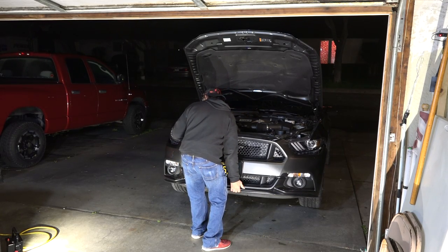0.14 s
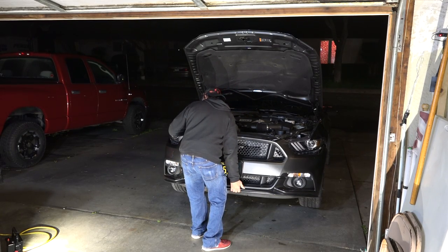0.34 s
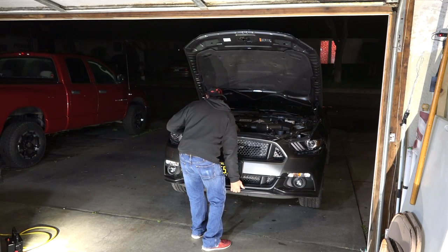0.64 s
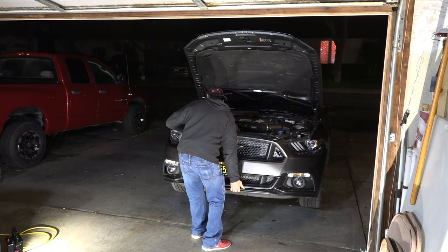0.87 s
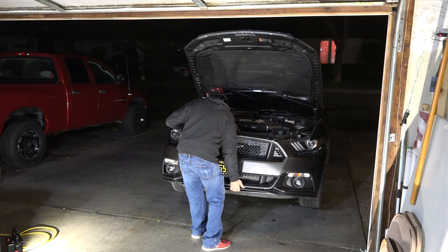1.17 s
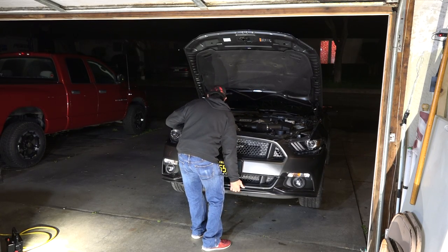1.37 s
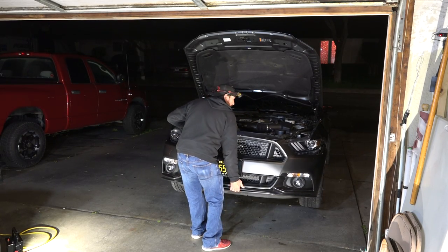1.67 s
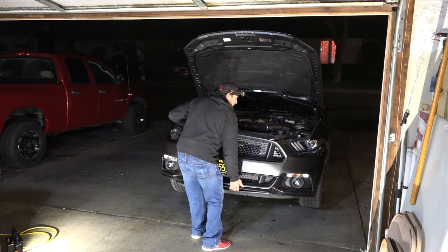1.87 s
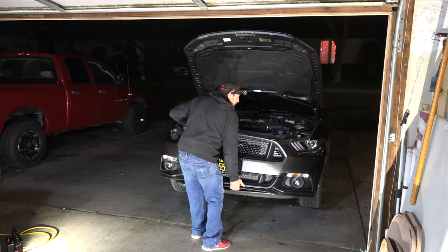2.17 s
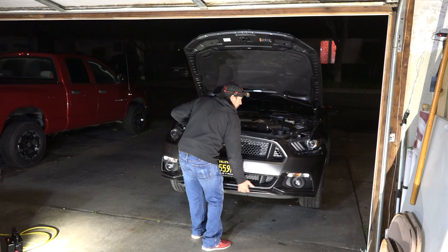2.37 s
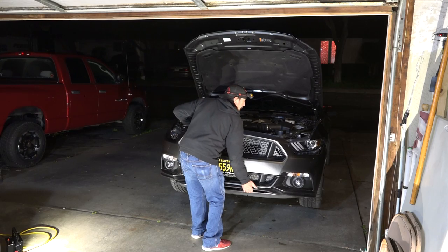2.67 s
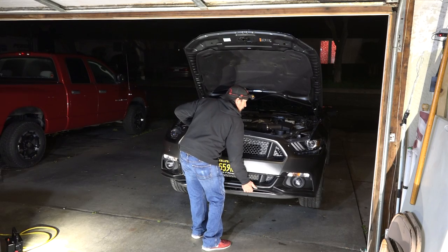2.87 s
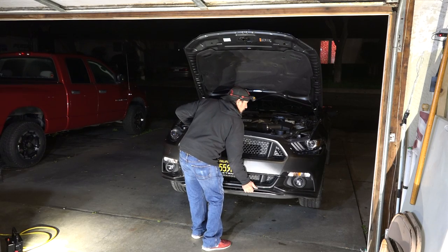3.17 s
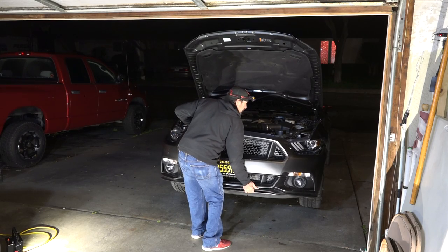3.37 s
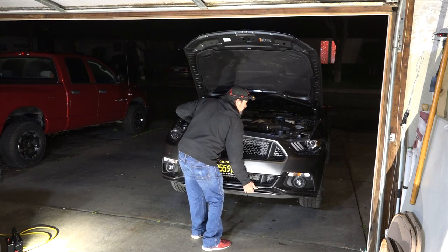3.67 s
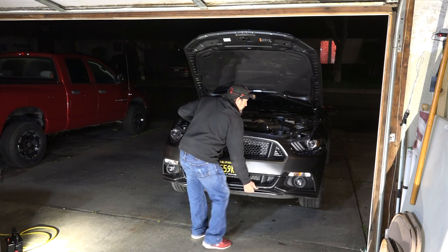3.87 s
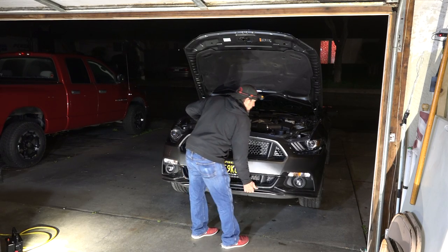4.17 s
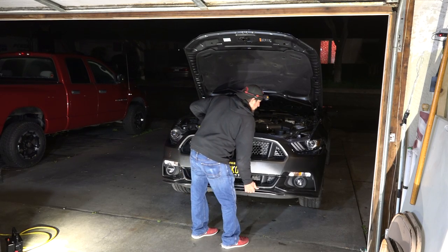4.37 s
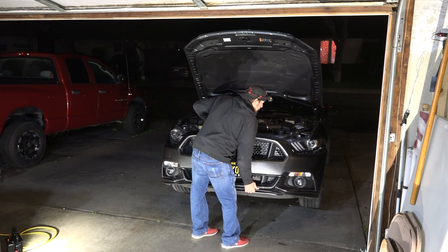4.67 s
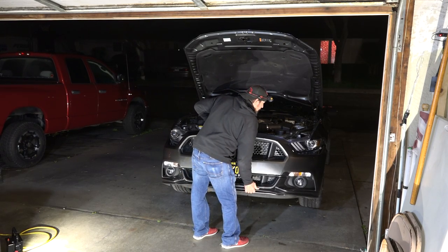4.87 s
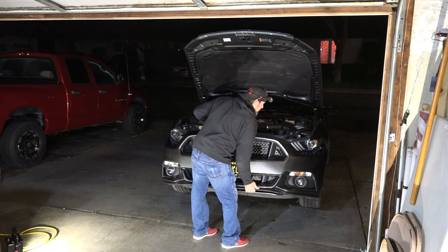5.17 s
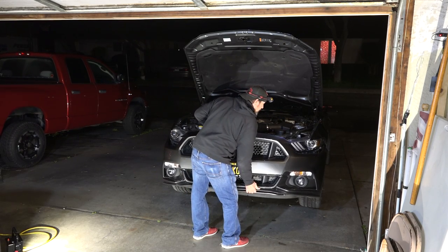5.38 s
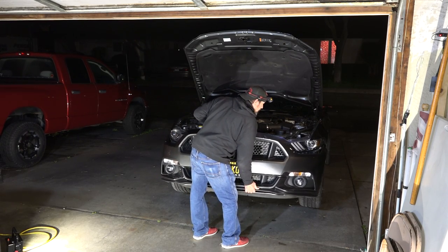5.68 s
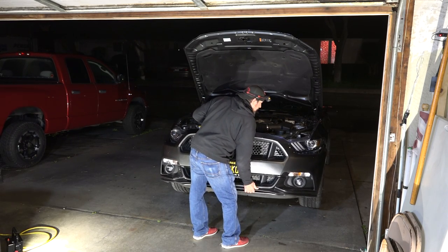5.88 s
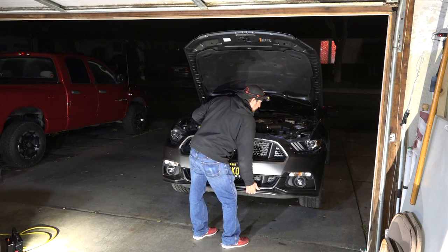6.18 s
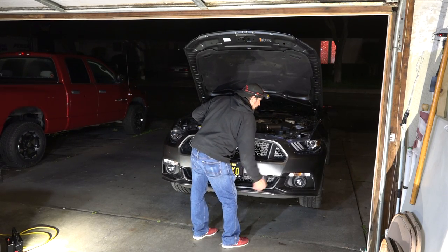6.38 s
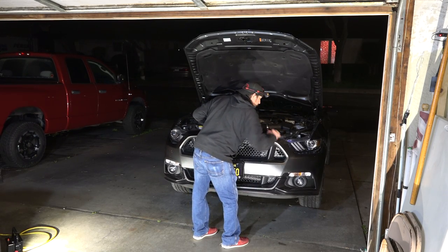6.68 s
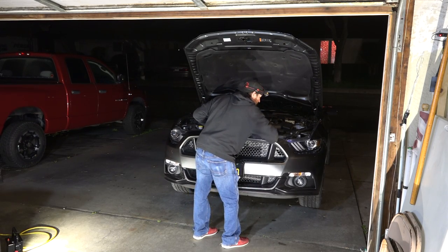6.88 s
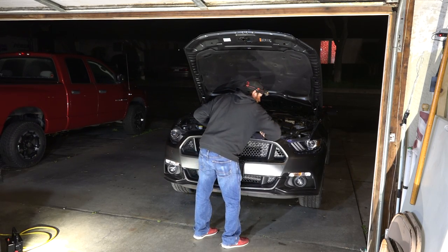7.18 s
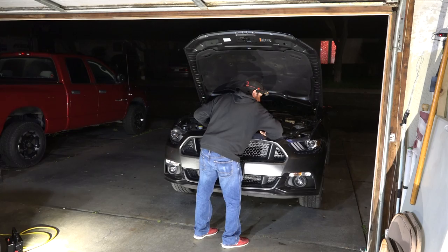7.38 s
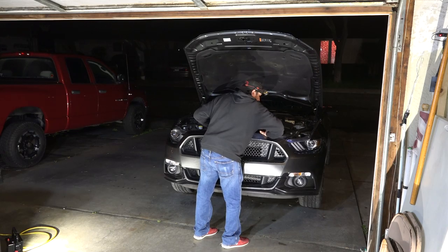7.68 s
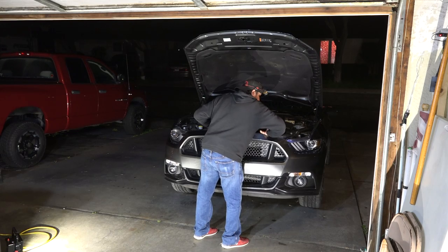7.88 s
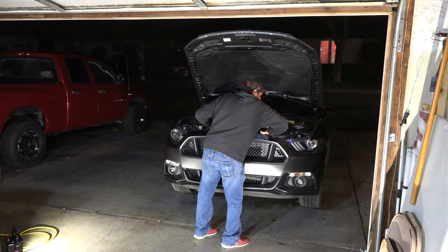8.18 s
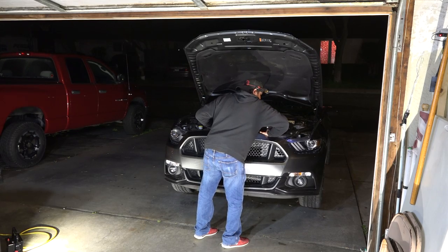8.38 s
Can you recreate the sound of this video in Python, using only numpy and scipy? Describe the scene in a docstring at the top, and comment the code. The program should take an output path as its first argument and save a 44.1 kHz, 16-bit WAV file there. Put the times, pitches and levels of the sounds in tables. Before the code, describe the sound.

Someone tugs a plastic bumper cover off a car by hand. Clips snap and the big panel flexes with irregular hollow knocks, sparse at first, busiest and loudest in the middle, then thinning out. Between them the plastic creaks and scrapes, and sleeves and shoes scuff softly. A push pin rasps briefly near the end. The microphone is a few metres away in a garage doorway, with a short echo, low town rumble and faint hiss.

```python
"""A plastic bumper cover is tugged off a car by hand, a few metres from a microphone in a garage doorway.
Fasteners snap and the big panel flexes, knocks and rings; a ribbed push pin rasps out near the end.
Between knocks the strained plastic creaks, edges scrape, and hand, sleeve and shoes scuff softly.
The garage answers with a short tail. Low town rumble and microphone hiss lie underneath."""
import sys
import numpy as np
from scipy import signal
from scipy.fft import rfft, irfft, next_fast_len
from scipy.io import wavfile
from scipy.ndimage import uniform_filter1d, map_coordinates

SR = 44100
rng = np.random.default_rng(int(sys.argv[2]) if len(sys.argv) > 2 else 0)


def dump_mix(stems):
    """Bounce the given channels to the path in sys.argv[1] as a 16-bit WAV at rate SR."""
    frames = np.atleast_2d(stems).T  # one column per channel
    limited = np.clip(frames, -1, 1)  # hard clip at full scale
    pcm = np.round(limited * 32767).astype(np.int16)
    wavfile.write(sys.argv[1], SR, pcm)


N = 376613

# Town rumble at the doorway. Each row: frequency in Hz, relative level in dB.
RUMBLE_COLOUR = [(15, -47), (25, -2), (103, -1.5), (129, -2.5), (151, -12.5), (180, -6.5), (280, -16),
                 (313, -17), (382, -16.5), (622, -21), (711, -21), (948, -20.5), (2010, -32), (3350, -39.5),
                 (5000, -49.5), (6500, -68), (11000, -120)]
# The garage's decay. Each row: frequency in Hz, t60 in seconds.
GARAGE_T60 = [(100, 0.35), (220, 0.49), (450, 0.37), (800, 0.28), (1500, 0.29), (4000, 0.28), (12000, 0.22)]
# The garage's tail against the direct sound at the microphone. Each row: frequency in Hz, gain in dB.
GARAGE_GAIN = [(100, 2), (500, -4.5), (1500, -1), (4000, -2), (7000, -3), (14000, -9)]
# The cover's broad colour. Each row: frequency in Hz, gain in dB.
COVER_COLOUR = [(60, -0.5), (140, 4.5), (450, -5), (1200, -7), (2000, -16.5), (3300, -13.5), (4300, -24),
                (7000, -33), (10000, -39), (15500, -42)]
# The cover's resonances. Each row: centre in Hz, width in Hz, height in dB.
COVER_MODES = [(143.8, 15, 5.5), (270, 65, 2.5), (433.6, 39, 5.5), (492, 38, 5), (740, 6.3, 5.5),
               (972, 85, 3.5), (1175, 18, 3), (1330, 44, 1.5), (2020, 55, 2.5), (2360, 37, 2),
               (2580, 32, 2.5), (3230, 320, 3), (4480, 110, 4)]
# Pulls that strain the cover. Each row: start in seconds, length in seconds, relative creak level in dB.
PULLS = [(0.9, 0.22, -36.5), (2.5, 0.49, -42.5), (3.95, 0.62, -40), (4.73, 0.27, -38), (5.35, 0.16, -42.5),
         (6.68, 0.54, -43), (7.35, 0.76, -46), (8.2, 0.071, -41.5)]
# Soft scuffs of hand, sleeve or shoe. Each row: peak time and length in seconds, relative level in dB.
SCUFFS = [(2.37, 0.22, -43.5), (4.012, 0.013, -51.5), (4.138, 0.008, -54), (4.84, 0.13, -50.5),
          (6.335, 0.12, -51.5)]
# Hiss of those scuffs. Each row: frequency in Hz, relative level in dB.
SCUFF_COLOUR = [(300, 5), (900, 1), (1400, 14.5), (1700, 4), (2050, 16.5), (2500, 4.5), (3300, 11),
                (4900, 4.5), (5600, 1), (11000, -1.5), (14000, -4), (15500, -8)]
# Plastic dragging on plastic. Each row: start and length in seconds, relative level in dB, squeak in Hz.
DRAGS = [(0.918, 0.013, -46.5, 3320), (1.627, 0.077, -38.5, 435), (2.636, 0.061, -52, 2120),
         (4.127, 0.026, -44.5, 6500), (4.282, 0.0098, -21.5, 975), (4.81, 0.03, -46, 900),
         (4.852, 0.025, -30, 2680), (4.993, 0.02, -29, 3220), (7.233, 0.032, -42, 725),
         (7.246, 0.08, -44.5, 3040), (7.809, 0.017, -41.5, 1290)]
# Friction in the creaks and in the drags. Each row: frequency in Hz, gain in dB.
CREAK_COLOUR = [(80, -20), (350, 2.5), (3000, -1.5), (8000, 4.0)]
DRAG_COLOUR = [(150, -16), (500, 10.5), (1200, 7.5), (4000, -3.5), (12000, -15)]
# The push pin's rasp. Each row: frequency in Hz, relative level in dB.
PIN_COLOUR = [(1000, -26), (2300, -24), (3200, 0), (4000, 5), (5200, 8), (6300, -27), (8300, 1),
              (10000, -3), (13500, 2), (15500, -13)]
# A knock's thump, body, clack, crack and snap. Each row: lower edge in Hz, upper edge in Hz.
KNOCK_BANDS = [(60, 280), (280, 700), (700, 1700), (1700, 4500), (4500, 15500)]
# Harder contacts are brighter. Each row, body to snap: usual offset in dB, dB gained per dB of hardness.
HARDNESS_TILT = [(0, 0), (-4.5, 0.4028), (-12.5, 1), (-24, 1.3017)]
# Contacts of the cover. Each row: time, rise and chatter t60 in seconds, ring of the struck spot in Hz,
# body level in dB, hardness in dB, heave of the whole panel in dB above the body.
CONTACTS = [(0.957,.001,.055,740,-45,14,0), (0.971,.0045,0.072,330,-35,0,2),
            (0.986,0.0003,0.017,794,-16.5,-4,-12), (0.989,0.00034,.036,5540,-33.5,18.5,9),
            (1.117,.003,.1,340,-36.5,-3.5,2.5), (1.204,0.0087,.056,480,-35.5,-0.5,-0.5),
            (1.248,0.0028,0.078,380,-37.5,-9,0), (1.388,.0012,0.056,855,-48.5,8.5,2),
            (1.526,.002,.052,550,-41,-6,-10), (1.991,0.0027,.055,735,-35,-13,-3.5),
            (2.752,.007,0.14,420,-27,-18,-2), (2.772,0.0052,0.07,1060,-30.5,0,0),
            (2.876,0.0028,0.032,405,-28,-15,-1.5), (2.895,0.0023,0.051,410,-25.5,-22,-7),
            (2.945,.0005,.056,440,-44.5,12,-5), (2.980,.0016,0.032,425,-27,-7.5,-2),
            (3.067,0.00026,.068,1360,-30,0,-5), (3.102,0.0068,0.056,344,-33.5,-3.5,2.5),
            (3.322,.0004,0.082,1650,-37.5,3,-15), (3.451,.0033,0.057,690,-30,-2.5,6),
            (3.859,.0016,0.056,290,-41.5,-1.5,-6), (3.974,.005,0.081,2070,-32.5,5,3),
            (4.012,.0025,0.045,287,-36,-7,3.5), (4.115,.0027,0.073,293,-43.5,-9,4),
            (4.185,0.0016,0.084,526,-44,12.5,3.5), (4.24,0.0027,0.046,1150,-33,4,-6),
            (4.288,0.0025,0.11,2580,-21,9.5,-3.5), (4.453,0.0013,.06,330,-30.5,0.5,3),
            (4.502,.003,0.028,438,-31.5,-28,-14), (4.644,0.0043,0.12,2970,-42,14.5,-12),
            (4.725,.005,0.05,430,-31.5,-13,-3.5), (4.858,.003,0.055,2530,-30.5,7,-20),
            (5.0,.0016,.062,1300,-32.5,6.5,-1), (5.032,.006,.05,920,-35.5,-6,6),
            (5.069,0.0027,0.034,900,-27,3.5,-10), (5.137,.0005,0.038,1140,-26.5,8.5,-6),
            (5.2,0.0014,.055,430,-26,-11,1), (5.374,0.0074,.09,413,-23.5,-9.5,-10),
            (5.405,0.0015,0.073,417,-18,-3,-.5), (5.675,0.0053,0.088,453,-28,1,3),
            (5.697,0.0046,0.063,465,-28.5,7.5,-3), (5.703,0.00084,0.031,460,-18,-28,-8.5),
            (5.77,.0009,0.1,1470,-33,2,8), (5.793,.0065,0.069,1850,-26,5.5,-6),
            (6.086,0.0062,0.031,297,-35,-16,3.5), (6.366,0.006,0.018,298,-36,-2,2.5),
            (6.773,.0011,0.094,1160,-34,-4,4.5), (6.792,0.0052,0.045,1170,-26,0.5,-2),
            (6.927,.002,.055,900,-43.5,7,-8), (7.955,0.0023,.042,307,-39,-7,-3.5),
            (8.048,0.00034,.066,1380,-34,17,-5), (8.219,.0015,0.047,3340,-49,9.5,4),
            (8.415,.0006,0.07,430,-33.5,-2,-4), (8.497,.0006,.052,1310,-38,9,-17)]


def amp(db):
    return 10 ** (np.asarray(db) / 20)


def unit(x):
    return x / np.sqrt(np.mean(x ** 2) + 1e-20)


def along(points, hz):
    """Read between (Hz, value) points on a log frequency axis."""
    point_hz, values = np.transpose(points)
    return np.interp(np.log(hz + 1), np.log(point_hz + 1), values)


def add(track, s, sound):
    """Lay a sound into the track at s seconds."""
    start = round(s * SR)
    track[start:start + len(sound)] += sound[:len(track) - start]


def coloured(x, gain_db):
    """Causal filter with the given dB as a function of frequency."""
    size = 2 * next_fast_len(len(x) // 2 + 2048)
    cepstrum = irfft(np.log(amp(gain_db(np.fft.rfftfreq(size, 1 / SR)))))
    cepstrum[1:size // 2] *= 2  # minimum phase: the ring follows the blow
    cepstrum[size // 2 + 1:] = 0
    return irfft(rfft(x, size) * np.exp(rfft(cepstrum)))[:len(x)]


def bump(hz, centre, width, db):
    """One resonance as a hump in dB."""
    return db / (1 + (2 * (hz - centre) / width) ** 2)


def grit(size, spread_db):
    """Noise whose samples vary widely in strength: tiny slips of uneven size."""
    return unit(rng.standard_normal(size) * amp(spread_db * rng.standard_normal(size)))


def swells(rows, rise, fall, sag=0):
    """Gain per sample of gestures that each rise, sag while held and fall, at rates in dB per second."""
    t = np.arange(N) / SR
    gain = np.zeros(N)
    for s, length, db in rows:
        before, after = np.maximum(s - t, 0), np.maximum(t - s - length, 0)
        held = np.clip(t - s, 0, length)
        gain += amp(db - rise * before - sag * held - fall * after)
    return gain


def town_rumble(level_db=-39.5):
    """Distant town rumble reaches the microphone through the open door."""
    return amp(level_db) * unit(coloured(rng.standard_normal(N), lambda hz: along(RUMBLE_COLOUR, hz)))


def in_garage(x, build_s=0.0045):
    """Direct sound from a few metres off, plus a diffuse tail of noise that dies faster in the treble."""
    direct = np.pad(x, (0, SR // 2))
    hz, t, spectrum = signal.stft(direct, SR, nperseg=256)
    age = t[t < .5]
    decay = (amp(-60 * age / along(GARAGE_T60, hz)[:, None]) * (1 - np.exp(-age / build_s))) ** 2
    decay /= decay.sum(axis=1, keepdims=True)
    energy = uniform_filter1d(np.abs(spectrum) ** 2, size=9, axis=0)
    lingering = signal.fftconvolve(energy, decay, axes=1)[:, :len(t)]
    noise = signal.stft(rng.standard_normal(len(direct)), SR, nperseg=256)[2]
    diffuse = noise / np.std(noise) * np.sqrt(np.abs(lingering)) * amp(along(GARAGE_GAIN, hz))[:, None]
    tail = signal.istft(diffuse, SR, nperseg=256)[1][:len(direct)]
    return (direct + tail)[:N]


def cover(hz):
    """Response of the plastic cover in dB: its resonances on top of its broad colour."""
    return along(COVER_COLOUR, hz) + sum(bump(hz, *mode) for mode in COVER_MODES)


def creaks(per_second=50, spread_db=3, slip_t60=0.064, held_db=-51, gain_db=-8):
    """The strained cover rubs in short slips, faint while only held and louder with each pull."""
    starts = (rng.random(N) < per_second / SR) * amp(spread_db * rng.standard_normal(N))
    t = np.arange(SR // 5) / SR
    slip = t * amp(-60 * t / slip_t60)
    rubbing = signal.fftconvolve(starts, slip)[:N] * rng.standard_normal(N)
    rung = coloured(in_garage(rubbing), lambda hz: cover(hz) + along(CREAK_COLOUR, hz))
    strain = np.hypot(amp(held_db), swells(PULLS, rise=90, fall=110))
    return unit(rung) * strain * amp(gain_db)


def soft_scuffs(gain_db=5):
    """Soft scuffs: hand and sleeve slide on the cover, shoes shuffle on the floor."""
    hiss = unit(coloured(grit(N, spread_db=3.5), lambda hz: along(SCUFF_COLOUR, hz)))
    return amp(gain_db) * hiss * swells(SCUFFS, rise=201, sag=32, fall=330)


def scrapes(width_share=0.14, squeak_db=18, gain_db=-2):
    """An edge drags over plastic and chirps in one broad resonance, with little hiss above it."""
    out = np.zeros(N)
    for s, length, db, squeak_hz in DRAGS:
        def colour(hz):
            squeak = bump(hz, squeak_hz, width_share * squeak_hz, squeak_db)
            roll_off = 10 * np.log10(1 + (hz / (2 * squeak_hz)) ** 2)
            return along(DRAG_COLOUR, hz) + squeak - roll_off

        size = round(length * SR)
        drag = rng.standard_normal(size) * signal.windows.tukey(size, .5)
        chirp = coloured(in_garage(drag), colour)
        add(out, s, amp(db + gain_db) * chirp / np.std(chirp[:size]))
    return out


def push_pin(start_s=8.047, length_s=0.018, level_db=-38):
    """The pin's ribs tear past the rim of its hole in one short bright rasp."""
    out, size = np.zeros(N), round(length_s * SR)
    ribs = grit(size, spread_db=9) * signal.windows.tukey(size, .3)
    rasp = coloured(in_garage(ribs), lambda hz: along(PIN_COLOUR, hz))
    add(out, start_s, amp(level_db) * rasp / np.std(rasp[:size]))
    return out


def struck_spot(hz, ring_hz, ring_db=7, ring_share=.17, uneven_db=2.5, spacing_hz=22, widen_hz=3000):
    """A struck spot favours one ring and stirs the panel's crowd of small modes unevenly, in dB."""
    mode_number = widen_hz / spacing_hz * np.log1p(hz / widen_hz)  # higher modes are broader
    strengths = map_coordinates(rng.standard_normal(1024), [mode_number], mode='wrap')
    return bump(hz, ring_hz, ring_share * ring_hz, ring_db) + uneven_db * strengths


def band_levels(db, hardness_db, heave_db):
    """A knock's dB from thump to snap: the heaving panel gives the thump, hardness tilts the rest."""
    return [db + heave_db] + [db + usual_db + tilt * hardness_db for usual_db, tilt in HARDNESS_TILT]


def knocks(flex_db=-13, flex_per_rise=24, bright_share=0.51, bright_db=3, dull_hz=2500, lead_s=.04):
    """The panel flexes into each contact, which chatters and rings the cover and the garage."""
    out = np.zeros(N)
    t = np.arange(SR // 6) / SR - lead_s
    after, attack = np.maximum(t, 0), np.flatnonzero((t > 0) & (t < lead_s))
    bands = [signal.butter(3, edges, 'bandpass', fs=SR, output='sos') for edges in KNOCK_BANDS]
    dull = signal.butter(2, dull_hz, fs=SR, output='sos')
    for s, rise, chatter_t60, ring_hz, body_db, hardness_db, heave_db in CONTACTS:
        onset = 1 - np.exp(-after / rise)
        # the softer the contact, the longer the panel bends before it
        flex = amp(flex_db - 60 * np.abs(t) / (flex_per_rise * rise))
        chatter = onset * amp(-60 * after / chatter_t60)
        rattle = signal.sosfilt(dull, grit(len(t), spread_db=6.5)) * (flex + chatter)
        # the sharp edges of the slips are over sooner than the rattle
        bright_decay = amp(bright_db - 60 * after / (bright_share * chatter_t60))
        sharp = grit(len(t), spread_db=4.5) * onset * bright_decay
        blow = coloured(in_garage(rattle + sharp), lambda hz: cover(hz) + struck_spot(hz, ring_hz))
        for band, db in zip(bands, band_levels(body_db, hardness_db, heave_db)):
            part = signal.sosfilt(band, blow)
            add(out, s - lead_s, amp(db) * part / np.std(part[attack]))
    return out


def scene():
    """At the doorway, everything reaches both channels alike."""
    sound = knocks() + push_pin() + creaks() + soft_scuffs() + scrapes() + town_rumble()
    return np.array([sound, sound])


def record(dry, hiss_db=-63.5, own_db=-63, own_hz=3600, low_cut_hz=40, top_hz=15830):
    """The microphone adds hiss, partly each channel's own in the treble, and cuts deep bass and the top."""
    treble = signal.butter(6, own_hz, 'highpass', fs=SR, output='sos')
    own_hiss = signal.sosfilt(treble, rng.standard_normal((2, N)))
    heard = dry + amp(hiss_db) * rng.standard_normal(N) + amp(own_db) * own_hiss
    size = next_fast_len(N + SR // 2)
    hz = np.fft.rfftfreq(size, 1 / SR)
    passband = hz ** 3 / np.sqrt(hz ** 6 + low_cut_hz ** 6) * (hz < top_hz)
    return irfft(rfft(heard, size) * passband, size)[:, :N]


dry = scene()
out = record(dry)
dump_mix(out)
```